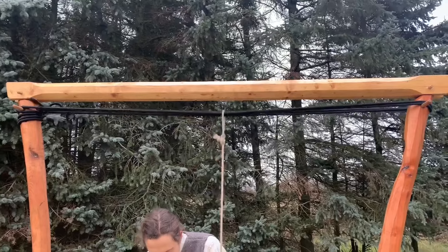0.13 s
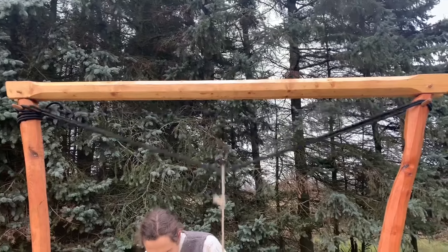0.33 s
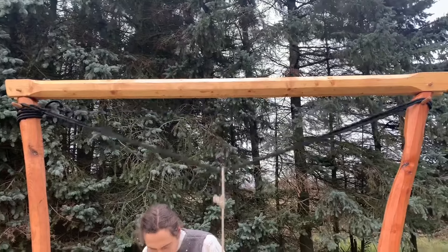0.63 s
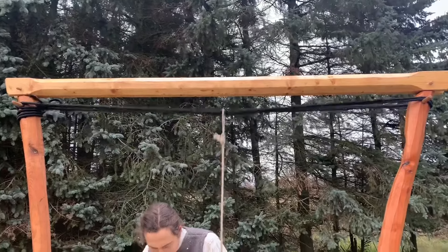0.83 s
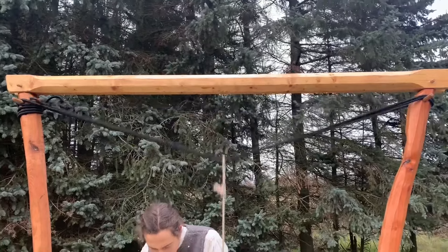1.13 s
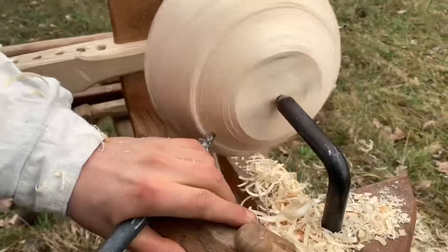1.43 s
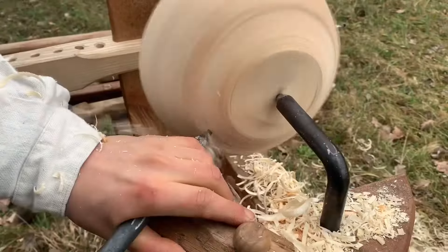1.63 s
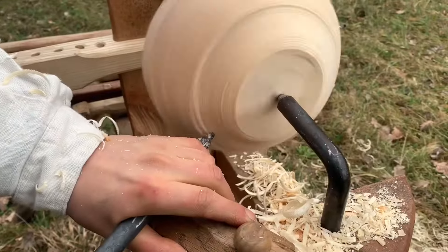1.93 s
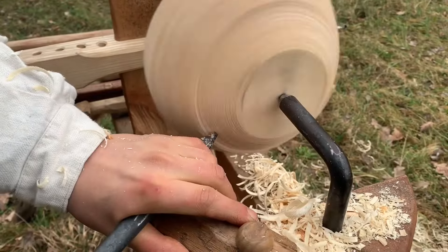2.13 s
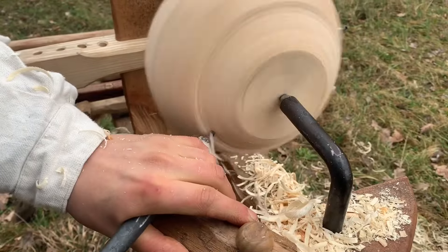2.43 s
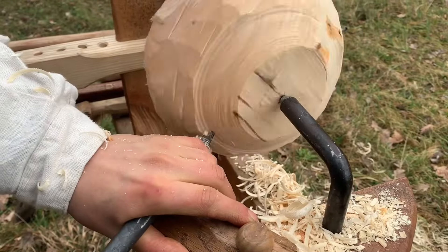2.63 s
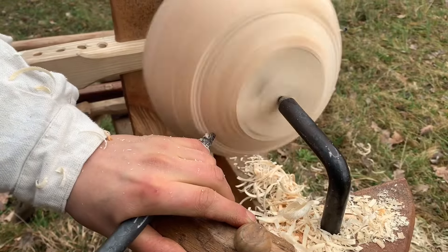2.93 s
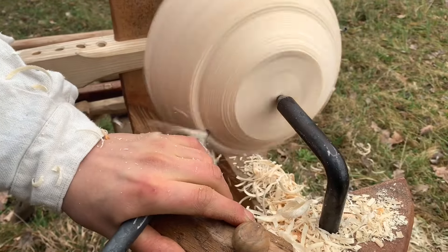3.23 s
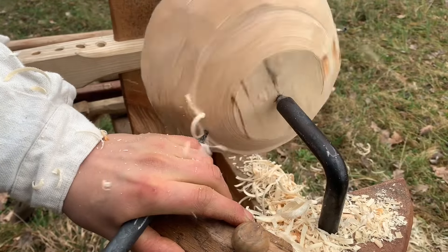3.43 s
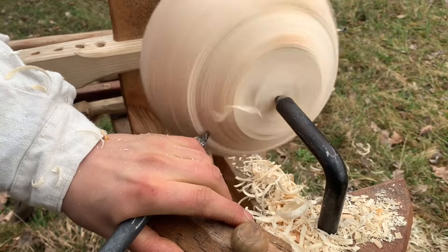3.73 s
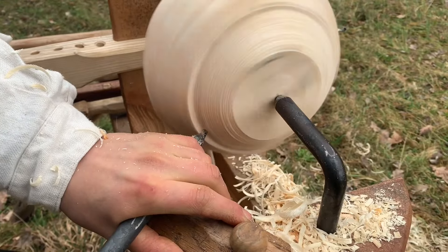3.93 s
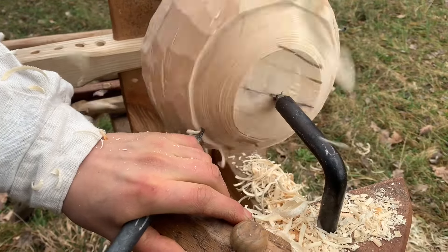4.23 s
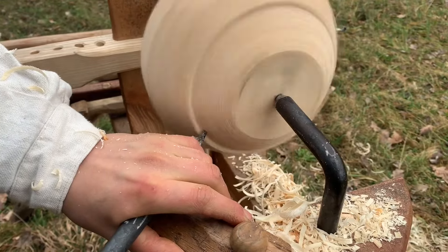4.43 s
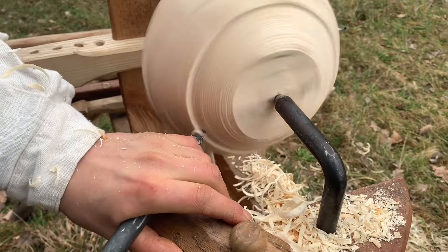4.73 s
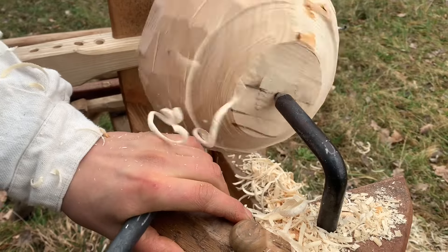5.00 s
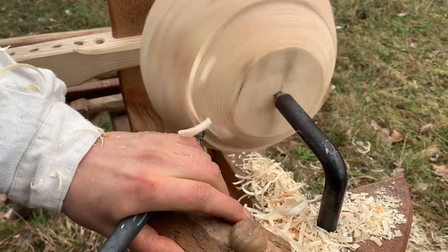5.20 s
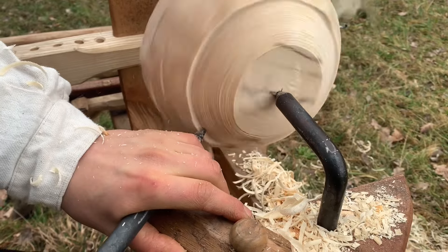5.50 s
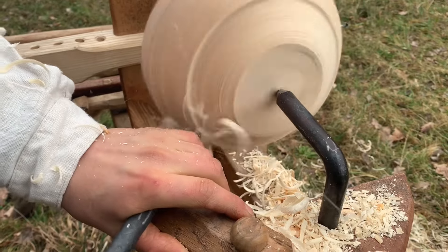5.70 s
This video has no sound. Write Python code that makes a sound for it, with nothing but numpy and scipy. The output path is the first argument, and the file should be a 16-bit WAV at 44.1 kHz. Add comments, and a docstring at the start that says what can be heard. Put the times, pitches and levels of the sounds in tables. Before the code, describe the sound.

A wooden bowl blank turns back and forth on a foot-powered lathe outdoors while a hook tool cuts it. From a more distant position, a raspy scrape runs from about 0.1 to 0.45 seconds, then faint brushing with low treadle thumps and dull knocks around 0.5 to 0.85, and another scrape from 1.0 to 1.25. At about 1.4 the sound dips briefly and jumps close. Rough tearing strokes follow at roughly 1.4-1.75, 2.2-2.6, 3.1-3.4, 3.85-4.15, 4.7-5.0 and 5.55-5.85, generally growing stronger, brighter and more chattering. Each is made of uneven gritty bursts and sharp snaps that ring the bowl and steel tool; especially hard bites come near 3.2, 4.9 and 5.7. Between them are quiet dry hiss and faint, brief mid-pitched hums. A loud woody clack hits at 4.14, with smaller knocks around 5.03. Low rumble and soft outdoor air lie underneath.

```python
"""Bowl turning on a treadle lathe

A hook tool cuts a rough wooden bowl blank outdoors; the sound jumps from a far to a close position.
Each down-stroke the edge bites through facets; on the return it only brushes them.
Tearing fibres are noise and sudden snaps that ring the bowl, the tool shank and the thin hook.
The frame knocks with falling tones and rumbles with low noise; a soft hum swells now and then.
Quiet outdoor air is a bed of noise below it all."""
import sys
import numpy as np
from scipy import signal
from scipy.fft import rfft, irfft, next_fast_len
from scipy.io import wavfile
from scipy.ndimage import uniform_filter1d

SR = 44100
rng = np.random.default_rng(int(sys.argv[2]) if len(sys.argv) > 2 else 0)


def output_pcm(signal):
    """Save a mono or channel-first signal as 16-bit PCM at the path in sys.argv[1].

    Samples are clipped to [-1, 1] before scaling.
    """
    pcm = np.clip(np.atleast_2d(signal).T, -1, 1) * 32767
    wavfile.write(sys.argv[1], SR, np.round(pcm).astype(np.int16))


N = 258426
TIME = np.arange(N) / SR
SWITCH_S = 1.378  # the sound jumps from a far to a close position

# Ringing tones of bowl, shank and hook: (pitch [Hz], width before its skirts are steepened [Hz],
# from afar: relative level [dB], left over right [dB], left leads by [rad], from close: the same three)
RING_MODES = [(244, 58, -8, 1, 0, -15.5, 3, 0), (352.6, 38, 0, -2, -0.3, -2.5, 0.5, -1.2),
              (480, 77, -2.5, 0.5, -1, -14.5, 3, 0), (648.3, 72, -4, 4, 1.1, -2.5, 0.5, 0.85),
              (789, 72, -3, 0, -0.2, -6.5, 4.5, -0.6), (1024, 64.4, 3.5, -1.5, 0.5, 0, 3.5, .5),
              (1272, 140, 0, -1.5, .5, -5.5, -4.5, 2.5), (1550, 330, -4, -4, 1.5, -7, 1, 2.5),
              (2166, 116.5, -1, -5, 1.43, -0.5, -2.5, 1.19), (2346, 110, -7.5, -1.5, 0.5, -16, -4, -3.5),
              (2814, 316, -1.5, 1, 3.5, -8.5, -0.2, -1.5), (3313, 100, -3.5, -9.5, -3.5, -4.5, -5, -1.44),
              (3655, 150, -9, 3, 2, -6, -1.5, 1.32), (3877, 140, -2.5, -3, 2.5, -14.5, -1.5, 2),
              (4446, 630, -8.5, -6, -2.5, -11, -5.5, -1.1), (5610, 270, -6, -2.5, -2, -10, -2, 3),
              (6390, 620, -24, -3.5, -1, -16.5, -2.5, 1.5), (7570, 470, -5, 1, 3, -10.5, 1.5, -2.5),
              (8376, 810, -9, 0.8, -0.5, -11.5, 0.1, 0.97), (9430, 287, -1.5, -2, 0.5, 2.5, -0.5, -5.2),
              (10060, 670, -8, 3.5, -2, -9, 1.5, -1), (12230, 390, -10, -1.5, 3, -3.5, 0.5, 2.5),
              (13450, 1600, -22, -3, -2.5, -16, -2, 0.5), (14360, 680, -15, 0, -0.5, -14.5, 1.5, 0.4),
              (14600, 770, -21, 0, -0.5, -19.5, -1.5, 1.5)]
SHANK_FROM_HZ, CHATTER_TO_HZ, HOOK_FROM_HZ = 1750, 2300, 5500

# Down-strokes of the treadle: (edge enters [s], full cut [s], edge starts to lift [s], clear [s],
# hook at full cut [dB], shank at full cut [dB], bowl above shank [dB], rumble at lift [dB],
# own growth through the cut [dB], chatter above shank [dB])
STROKES = [(0.117, 0.216, 0.38, 0.48, -40, -42.5, -4.5, -45, 5.5, -0.5),
           (0.97, 1.023, 1.237, 1.25, -35, -43, -1, -60, -2.5, -1),
           (1.371, 1.477, 1.662, 1.788, -40, -45, -9, -53.5, 3, -2.5),
           (2.203, 2.261, 2.545, 2.593, -41, -42, -13, -51, 8, -6.5),
           (3.068, 3.137, 3.352, 3.41, -34.5, -35, -10, -50, 3, -0.5),
           (3.826, 3.975, 4.12, 4.18, -33, -33.5, -7, -46.5, 3, 3.5),
           (4.668, 4.72, 4.906, 5.02, -34.5, -34.5, -5, -42.5, 4, 4),
           (5.527, 5.586, 5.805, 5.86, -29.5, -31.5, -6, -43, -6, 2)]
ENTER_DB, ENTER_CURVE, LIFT_DB, LIFT_CURVE = -40.5, 1.52, -38, 1.14  # fall of the force at the ends
# The edge sinks deeper as a stroke goes on: shank growth adds to the stroke's own, bowl to the shank's
SHANK_GROWTH_DB, BOWL_GROWTH_DB, RUMBLE_GROWTH_DB = 3, 4, 5.5
BOWL_LINGER, RUMBLE_LINGER = 0.87, 0.24  # share of the fall at the ends that each follows

# The edge catches the corner of a facet: (peak [s], hook [dB], shank [dB], time to fall 6 dB [ms])
CATCHES = [(.006, -57, -52.5, 6), (0.204, -32, -39.5, 10), (0.295, -26, -25, 5), (0.708, -50.5, -50, 18),
           (0.767, -43.5, -44, 7), (1.111, -30, -32, 10), (1.526, -27.5, -52, 10), (1.566, -34, -38, 12),
           (1.615, -23.5, -32, 7), (1.638, -25.5, -50, 8), (1.877, -56, -61.5, 13), (2.271, -35.5, -52, 5),
           (2.343, -29, -51, 12), (2.393, -23.5, -22.5, 10), (2.771, -53, -52, 10),
           (2.886, -47.5, -44, 7.5), (3.118, -32.5, -42.5, 17), (3.161, -24.5, -41, 26),
           (3.213, -18.5, -15, 7.5), (3.223, -14.5, -26, 5.5), (3.619, -49.5, -51, 3),
           (3.745, -54, -56.5, 42), (4.059, -37, -17.5, 6.5), (4.102, -39, -25.5, 9),
           (4.172, -45, -44.5, 18), (4.329, -38.5, -35, 8), (4.376, -46, -42, 5), (4.462, -44.5, -54, 1),
           (4.496, -44, -46.5, 7), (4.577, -50, -51.5, 33), (4.771, -21.5, -27, 8.5),
           (4.888, -18.5, -19.5, 10.5), (5.034, -50, -56, 2), (5.054, -62, -54.5, 3),
           (5.368, -47, -49.5, 9.5), (5.54, -37.5, -36.5, 13), (5.71, -16.5, -19.5, 10),
           (5.732, -27, -27.5, 14), (5.753, -27, -23.5, 20)]
CATCH_RISE_MS = 5.16  # time to rise 6 dB
# The edge rides over a high spot: (peak [s], hook [dB], shank [dB], time to rise 6 dB [ms])
HIGH_SPOTS = [(0.065, -60.5, -52.5, 9.5), (0.124, -57, -50, 20.5), (.174, -40.5, -40, 16.5),
              (0.267, -38.5, -40, 12), (0.344, -32.5, -35.5, 17), (0.403, -37.5, -39, 13.5),
              (0.637, -52.5, -50, 15), (0.963, -47.5, -48.5, 16.5), (1.002, -38, -42.5, 12.5),
              (1.033, -29.5, -38.5, 7.5), (1.089, -29.5, -35, 8.5), (1.126, -27, -37, 9),
              (1.148, -38, -32.5, 12.5), (1.217, -43, -39, 12.5), (1.538, -30.5, -35, 10.5),
              (1.724, -41.5, -44, 24), (2.307, -27.5, -52, 11), (2.372, -23.5, -28, 9),
              (2.416, -19, -28.5, 11), (2.444, -22, -25.5, 12), (2.466, -21.5, -29, 9),
              (2.513, -26.5, -32.5, 17), (3.072, -45.5, -48, 14), (3.273, -22.5, -47, 6),
              (3.332, -23, -19.5, 12.5), (3.454, -51, -49, 25), (3.706, -45, -50.5, 7.5),
              (3.992, -24.5, -35, 25.5), (4.05, -20, -18.5, 14.5), (4.246, -59.5, -62.5, 18.5),
              (4.35, -28, -29.5, 6.5), (4.755, -24.5, -24, 24), (4.821, -18.5, -22, 20.5),
              (4.876, -21, -24, 10), (4.928, -37, -31.5, 10), (5.095, -58, -61, 27),
              (5.579, -20.5, -21.5, 7), (5.649, -16, -19, 19.5), (5.695, -27, -20, 7),
              (5.784, -18.5, -25, 8)]
HIGH_SPOT_FALL, HIGH_SPOT_SKIP_LEAD = 0.46, 2.2  # both as multiples of the rise time
# The edge skips the hollow before a facet
SKIP_SHARE, CATCH_SKIP_LEAD_MS, SKIP_HALF_WIDTH_MS = 0.34, 10.9, 3.9

# Returns, the edge brushing the blank: (start [s], end [s], hook at middle [dB],
# shank at middle [dB], growth from start to end [dB])
RETURNS = [(-.2, 0.093, -69, -55, -14), (0.47, 0.913, -64.5, -57, -5), (1.2, 1.41, -73, -59, -18),
           (1.828, 2.236, -70, -73, -2), (2.65, 3.063, -63.5, -65, -1.5), (3.414, 3.877, -65.5, -67, 3),
           (4.363, 4.683, -65, -63, -16), (5.096, 5.537, -72, -71.5, 4.5)]
RETURN_ENDS_DB, RETURN_CURVE, RETURN_FLICKER_DB = -20, 4.1, 5.5
RETURN_BOWL_DB, RETURN_CHATTER_DB = -5, -2.5  # against the shank
BRUSH_RING_DB = -5.5  # how little the light rub rings the tool
CHATTER_BREAKS_DB = 2.5  # strength of the chatter's uneven bursts
# Colour of the dry rub on the return: (pitch [Hz], relative level [dB per Hz])
BRUSH_COLOUR = [(760, -44), (1300, -14), (2950, -13.5), (3310, -38), (4030, -16), (4370, -3), (6350, -2.5),
                (7200, -8), (9420, -1), (11500, -25), (12900, -8), (15500, -6)]

# Knocks through the frame: (start [s], level [dB], strongest pitch [Hz], spread [octaves], rattle [0-1])
KNOCKS = [(.05, -37.5, 305, 1.34, 0.9), (.522, -38.5, 480, 1.3, 0.7), (0.769, -29.5, 80.5, 0.74, 0.2),
          (0.805, -33, 74.5, 0.66, 0.16), (.842, -38.5, 201.6, 2.3, 0.66), (1.148, -31, 328, 1.6, 0),
          (1.328, -47, 352, 1.3, 0), (2.6218, -35.5, 249, 1.14, 0.15), (4.1393, -10.5, 1005, 0.61, 0.5),
          (5.001, -40, 550, 0.77, 0.54), (5.033, -23, 808, 0.79, 0.28), (5.0593, -34, 218, 1.1, 0.1),
          (5.233, -44, 182, 1.24, 0), (5.371, -44, 385, 0.44, 1), (5.83, -39, 750, .6, .4)]
KNOCK_DAMPING = 1.09  # the low tail of a knock dies sooner than its high start grows
# High-pitched knocks also jolt the tool shank: a short clack, sized against the knock
CLACK_FROM_HZ, CLACK, CLACK_HZ, CLACK_S = 800, 0.47, 2230, 0.00094

# A soft hum while the bowl spins back: (peak [s], level [dB], half length [s])
HUM = [(2.025, -55, 0.036), (2.863, -53, 0.038), (3.654, -60, 0.043), (4.466, -61.5, 0.043),
       (5.313, -67, 0.078)]
HUM_HZ, HUM_WIDTH_HZ = 776, 56

# Colour of the frame's rumble: (pitch [Hz], relative level [dB per Hz])
RUMBLE_COLOUR = [(20, -37), (35, -9), (55, 0.5), (80, -1.5), (110, -3.5), (140, -15), (250, -19.5),
                 (400, -40.5), (1200, -90)]
RUMBLE_FAR_DB, RUMBLE_CLOSE_DB, RUMBLE_LUMPS_DB = -51, -58, 3.5
# Thumps of the treadle: (peak [s], level [dB], speed of fall [dB/s])
THUMPS = [(.1, -40.5, 64), (.62, -44, 120), (.775, -37, 82), (1.04, -43, 400), (1.155, -42, 450),
          (5.06, -49, 202)]
THUMP_RISE_S = 0.043

# Colour of the outdoor air: (pitch [Hz], relative level [dB per Hz])
AIR_COLOUR = [(90, -31.5), (130, -8), (300, -10.5), (420, -12), (850, -13.5), (1100, -26), (1700, -29),
              (4500, -41), (9000, -49.5), (15800, -62)]
AIR_FAR_DB, AIR_CLOSE_DB = -53.5, -62.5

DELAYS_DB, DELAY_FROM_S, DELAY_TO_S = -10, .002, .012  # short delays that widen the sound
TREBLE_LIMIT_HZ = 15750


def cutting():
    """Fibres tear in short clumps: independent noise streams, each of which rings some of the modes."""
    table, switch, streams = np.array(RING_MODES), int(SWITCH_S * SR), 7
    pitch, width = table[:, :1], table[:, 1:2]
    part = 2 - np.digitize(table[:, 0], [SHANK_FROM_HZ, HOOK_FROM_HZ])  # 0 hook, 1 shank, 2 bowl

    # One row of clumps for each force: hook, shank, bowl, chatter
    slow_clumps_db = np.array([[1.6], [1.6], [1.4], [1.5]])
    clumps = amp(1.38 * wander(.0006) + slow_clumps_db * wander(.0025, count=4))
    # Chips break off suddenly, about 200 a second
    snaps = (rng.random(N) < 200 / SR) * np.minimum(rng.exponential(0.36, N), 1.1)
    clumps *= 1 + signal.lfilter([1], [1, -np.exp(-1 / (0.0024 * SR))], snaps)
    # Each stream's level wanders, so the timbre shifts
    shares = amp(2.8 * wander(.022, count=streams))
    # Each chip ticks in all streams
    fibres = evened(shares * (rng.standard_normal((streams, N)) + 5.7 * snaps))
    tearing = ((forces() * evened(clumps))[:, None] * fibres).reshape(-1, N)

    # Choose the force by part, and deal out the streams to the modes in turn
    chatters = (part == 1) & (table[:, 0] < CHATTER_TO_HZ)
    source = np.where(chatters, 3, part) * streams + np.arange(len(table)) % streams
    steep = np.array([.27, .12, .16])[part, None]  # extra fall of the skirts of hook, shank, bowl modes
    out = np.zeros((2, N))
    afar, close = (slice(0, switch), table[:, 2:5].T), (slice(switch, N), table[:, 5:8].T)
    for span, (db, pan_db, lead) in (afar, close):
        length = span.stop - span.start
        size = next_fast_len(length)
        off = 2 * (np.fft.rfftfreq(size, 1 / SR) - pitch) / width
        ring = amp(db)[:, None] / (1 + 1j * off) / (1 + off ** 2) ** steep
        left = amp(pan_db / 2) * np.exp(.5j * lead)
        # Even out the total ringing power of each part, so the forces set its loudness
        mode_power = abs(left + 1 / left) ** 2 / 4 * np.mean(abs(ring[:, ::8]) ** 2, 1)
        part_power = np.bincount(part, mode_power)
        ears = np.array([left, 1 / left]) / np.sqrt(part_power[part])
        ringing = ring * rfft(tearing[:, span], size)[source]
        out[:, span] = irfft(ears @ ringing, size)[:, :length]
    return out


def forces():
    """Force on hook, shank, bowl and chatter mode: strokes and returns plus a hump for each facet."""
    cut = strokes()
    brush = amp(BRUSH_RING_DB) ** 2 * returns()
    bites, kept = facets()
    steady = cut[1] + brush[1]
    depth = np.sqrt((cut[2] + amp(RETURN_BOWL_DB) ** 2 * brush[1]) / steady)
    hook, shank = kept * np.sqrt(cut[:2] + brush + bites)
    load = np.clip(uniform_filter1d(shank, 2000) / uniform_filter1d(hook, 2000), .1, 4)
    surge = shank / uniform_filter1d(shank, 4000)
    # A heavy cut bends the shank in its lowest modes
    chatter_share = np.sqrt((cut[4] + amp(RETURN_CHATTER_DB) ** 2 * brush[1]) / steady)
    chatter = 1.186 * shank * load ** .48 * chatter_share
    # It comes in bursts, with the bites
    chatter *= surge ** 0.3 * amp(CHATTER_BREAKS_DB * (wander(.009)[0] - 0.36))
    return np.array([hook, shank, shank * depth, chatter])


def strokes():
    """Steady power on hook, shank, bowl, frame and chatter mode: each stroke enters, deepens, and lifts."""
    power = np.zeros((5, N))
    for (enter, full, lift, clear, hook_db, shank_db, bowl_db,
         rumble_db, growth_db, chatter_db) in STROKES:
        enter_db = ENTER_DB * np.clip((full - TIME) / (full - enter), 0, 3) ** ENTER_CURVE
        lift_db = LIFT_DB * np.clip((TIME - lift) / (clear - lift), 0, 3) ** LIFT_CURVE
        ends_db = enter_db + lift_db
        done = np.clip((TIME - full) / (lift - full), 0, 1)
        hook = hook_db + growth_db * done + ends_db
        shank = shank_db + (growth_db + SHANK_GROWTH_DB) * done
        bowl = shank + bowl_db + BOWL_GROWTH_DB * done ** 3 + BOWL_LINGER * ends_db
        frame = rumble_db + RUMBLE_GROWTH_DB * (done - 1) + RUMBLE_LINGER * ends_db
        power += amp([hook, shank + ends_db, bowl, frame, shank + ends_db + chatter_db]) ** 2
    return power


def facets():
    """Power on hook and shank from catches and high spots, and the share of contact kept."""
    power, kept = np.zeros((2, N)), np.ones(N)
    rows = [(s, hook, shank, CATCH_RISE_MS, fall, CATCH_SKIP_LEAD_MS)
            for s, hook, shank, fall in CATCHES]
    rows += [(s, hook, shank, rise, HIGH_SPOT_FALL * rise, HIGH_SPOT_SKIP_LEAD * rise)
             for s, hook, shank, rise in HIGH_SPOTS]
    for peak_s, hook_db, shank_db, rise, fall, lead in rows:
        near = slice(max(int((peak_s - .1) * SR), 0), int((peak_s + .1) * SR))
        ms = (TIME[near] - peak_s) * 1000
        drop_db = 6 * np.where(ms < 0, -ms / rise, ms / fall) ** 1.5
        power[:, near] += amp(np.array([[hook_db], [shank_db]]) - drop_db) ** 2
        kept[near] *= 1 - SKIP_SHARE * np.exp(-.5 * ((ms + lead) / SKIP_HALF_WIDTH_MS) ** 2)
    return power, kept


def returns():
    """Faint power on hook and shank: each return swells and fades in an arch that may lean to one end."""
    power = np.zeros((2, N))
    for start, end, hook_db, shank_db, growth_db in RETURNS:
        place = np.clip(2 * (TIME - start) / (end - start) - 1, -1.6, 1.6)  # -1 at start, 1 at end
        arch_db = RETURN_ENDS_DB * abs(place) ** RETURN_CURVE + growth_db * place / 2
        power += amp(arch_db + np.array([[hook_db], [shank_db]])) ** 2
    return power


def brushing():
    """The back of the edge rubs the wood: dry flickering hiss."""
    flicker = amp(RETURN_FLICKER_DB * wander(0.0033))
    return np.sqrt(returns()[0]) * flicker * coloured([(700, -40)] + list(BRUSH_COLOUR), 0.32)


def knocks():
    """Bending waves in the beams: high pitches arrive first, so a knock falls as 1 / time; joints rattle."""
    out, t = np.zeros((2, N + SR)), np.arange(1, 4000) / SR
    for (s, db, peak_hz, octaves, rattle), luck in zip(KNOCKS, rng.random((len(KNOCKS), 3, 5))):
        turns = 1.55 * (peak_hz / 220) ** .25  # low knocks fall in fewer cycles
        above = np.log2(turns / t / peak_hz) / octaves  # pitch against the strongest
        damped = above * np.where(above < 0, KNOCK_DAMPING, 1)
        window = np.exp(-.3 * abs(damped) ** 2.8)  # blunt: sudden start, flat top
        wave = amp(db) * window * np.sin(2 * np.pi * turns * np.log(t))
        clack = (peak_hz > CLACK_FROM_HZ) * CLACK * (t / CLACK_S) ** 2 * np.exp(2 - 2 * t / CLACK_S)
        wave += amp(db) * clack * np.sin(2 * np.pi * CLACK_HZ * t)
        out[:, round(s * SR):][:, :len(t)] += wave
        for late, size, side in luck.T:  # repeats within a few cycles
            ears = np.array([[1 + 0.58 * (side - .5)], [1 - 0.5 * (side - .5)]])
            start = round((s + 4.5 * late / peak_hz) * SR)
            out[:, start:][:, :len(t)] += rattle * (2 * size - 1) * ears * wave
    return out[:, :N]


def hum():
    """Narrow noise around one pitch that swells and fades."""
    low_hz, high_hz = HUM_HZ - 2 * HUM_WIDTH_HZ, HUM_HZ + 2 * HUM_WIDTH_HZ
    shape = [(300, -80), (low_hz, -22), (HUM_HZ, 0), (high_hz, -22), (1500, -80)]
    swell = sum(amp(db) * np.exp(-.5 * ((TIME - s) / half) ** 2) for s, db, half in HUM)
    return swell * coloured(shape, 0.9)


def rumble():
    """Low lumpy noise, nearly the same in both ears: it swells with each stroke and thump."""
    power = amp(np.where(TIME < SWITCH_S, RUMBLE_FAR_DB, RUMBLE_CLOSE_DB)) ** 2 + strokes()[3]
    for s, db, fall in THUMPS:
        rise = np.clip((TIME - s) / THUMP_RISE_S + 1, 0, 1)
        power += (rise * amp(db - fall * np.maximum(TIME - s, 0))) ** 2
    return np.sqrt(power) * amp(RUMBLE_LUMPS_DB * wander(.05)) * coloured(RUMBLE_COLOUR, 0.99)


def air():
    """The yard's soft background: coloured noise whose level wavers."""
    level_db = np.where(TIME < SWITCH_S, AIR_FAR_DB, AIR_CLOSE_DB) + 3 * wander(.025)
    return amp(level_db) * coloured(AIR_COLOUR, 0.79)


def amp(db):
    """Turn decibels into a plain multiplier."""
    return 10 ** (np.asarray(db) / 20)


def evened(x):
    """Scale a signal to an average (RMS) strength of one."""
    return x / np.sqrt(np.mean(x ** 2) + 1e-20)


def wander(seconds, count=1):
    """Smooth chance of unit spread that changes within the given time."""
    step = max(int(seconds * SR), 2)
    knots = rng.standard_normal((count, N // step + 2))
    lines = [np.interp(np.arange(N) / step, np.arange(len(k)), k) for k in knots]
    return np.array(lines) * np.sqrt(3 / 2)  # makes up for the spread lost between knots


def coloured(shape, same):
    """Two channels of noise with a spectrum; same is their likeness."""
    hz = np.fft.rfftfreq(N, 1 / SR)
    shape_hz, shape_db = np.transpose(shape)
    middle, apart = rng.standard_normal((2, N))
    side = np.sqrt(np.clip((1 - same) / (1 + same), 0, 1))
    pair = np.array([middle + side * apart, middle - side * apart])
    gain = amp(np.interp(np.log(hz + 1), np.log(shape_hz), shape_db))
    return evened(irfft(rfft(pair) * gain, N))


def widened(x):
    """A few random short delays, different in each ear, widen the sound."""
    taps = np.zeros((2, 1000))
    for late, sign in rng.random((6, 2, 2)):
        delay_s = DELAY_FROM_S + (DELAY_TO_S - DELAY_FROM_S) * late
        taps[[0, 1], (delay_s * SR).astype(int).clip(0, 999)] += np.sign(sign - .5)
    return x + amp(DELAYS_DB) / np.sqrt(6) * signal.oaconvolve(x, taps, axes=1)[:, :N]


def scene():
    """Cutting and knocks, widened, over the brushing, hum, rumble and air."""
    return widened(cutting() + knocks()) + brushing() + hum() + rumble() + air()


def record(dry):
    """A short fade out and in at the jump, bass roll-off, soft overload on peaks, then the treble limit."""
    fade_s = SWITCH_S + np.array([-0.015, -0.003, 0.015, 0.024])
    fade = np.interp(TIME, fade_s, [0.93, 0.054, 0.058, 0.94])
    sound = signal.sosfilt(signal.butter(2, 38, "high", fs=SR, output="sos"), dry * fade)
    sound = .9 * np.tanh(sound / .9)
    treble_limit = signal.firwin(511, TREBLE_LIMIT_HZ, window=("kaiser", 9), fs=SR)
    return signal.oaconvolve(sound, treble_limit[None], "same")


dry = scene()
out = record(dry)
output_pcm(out)
```